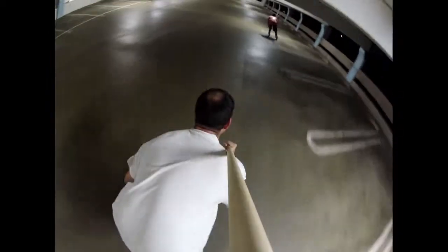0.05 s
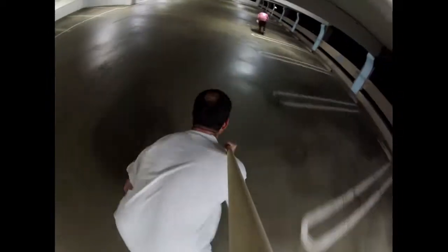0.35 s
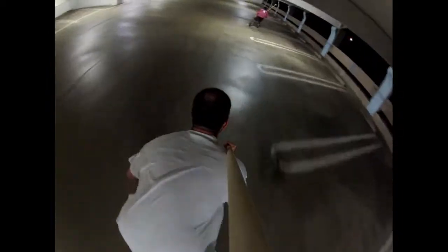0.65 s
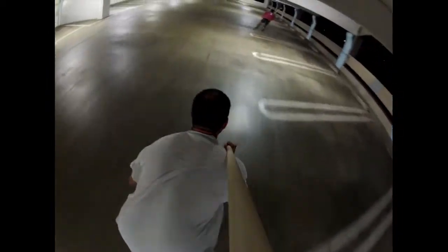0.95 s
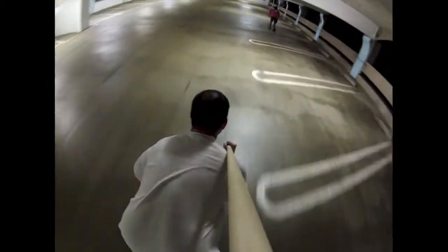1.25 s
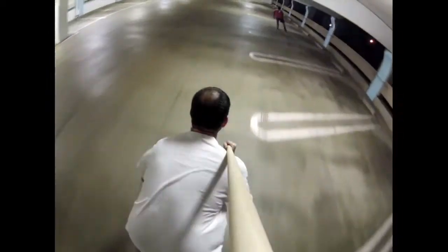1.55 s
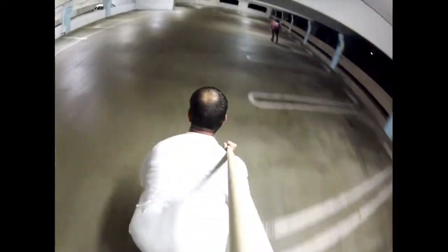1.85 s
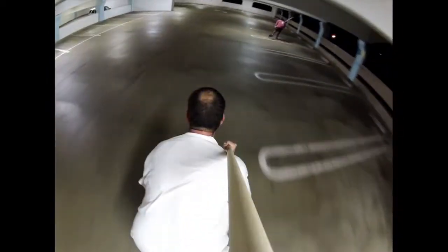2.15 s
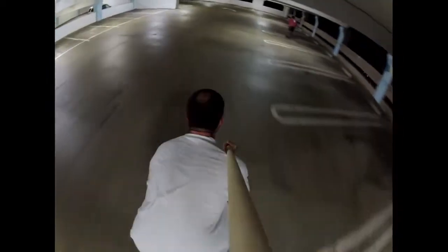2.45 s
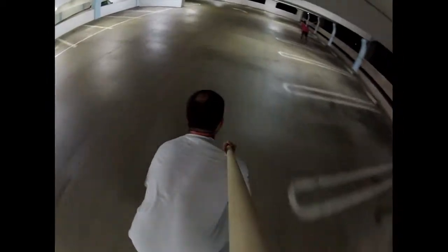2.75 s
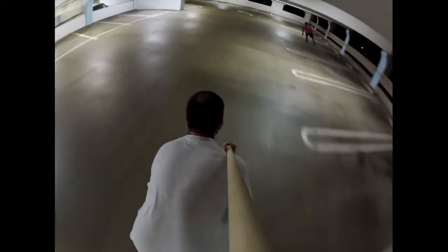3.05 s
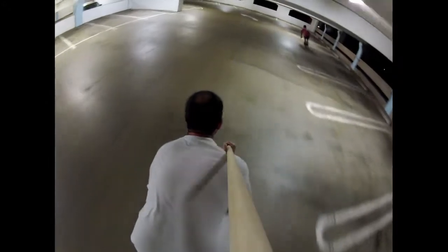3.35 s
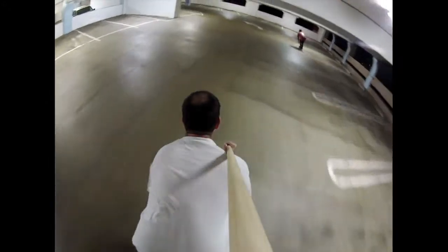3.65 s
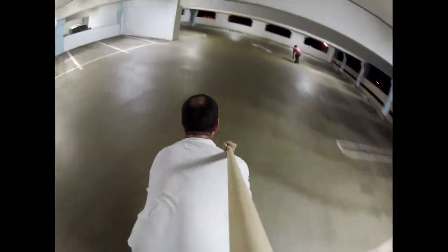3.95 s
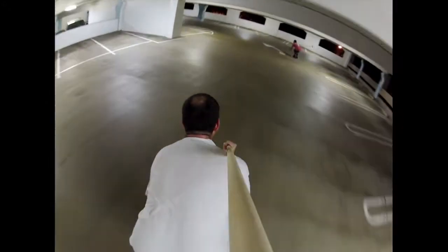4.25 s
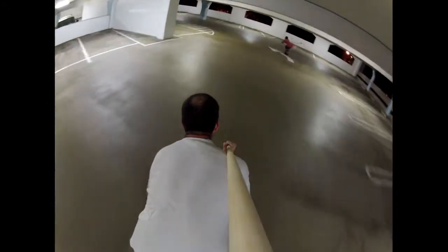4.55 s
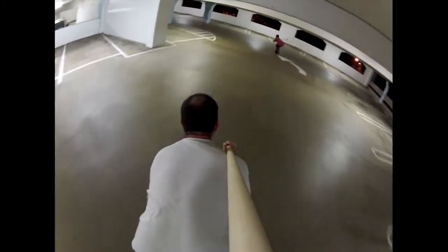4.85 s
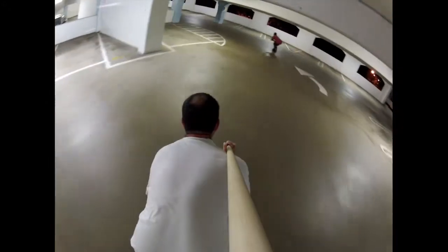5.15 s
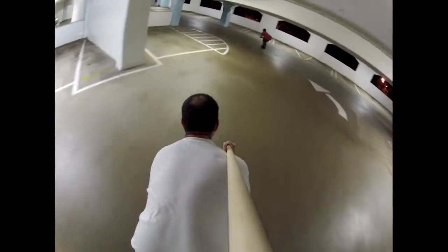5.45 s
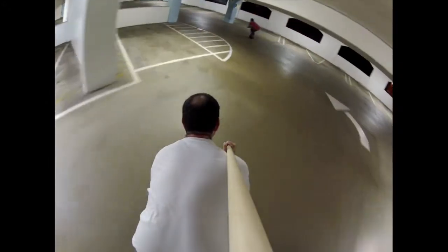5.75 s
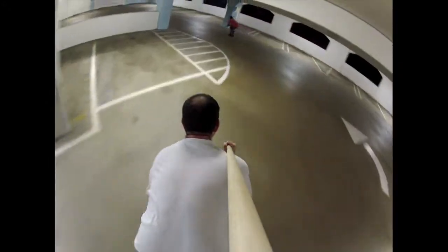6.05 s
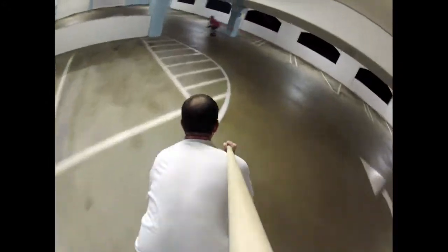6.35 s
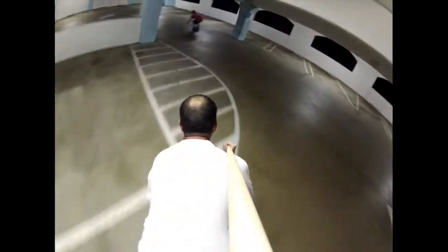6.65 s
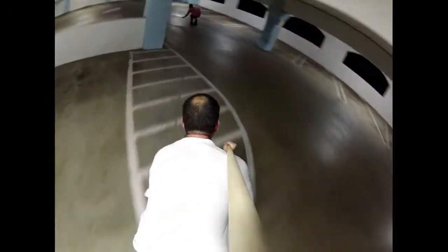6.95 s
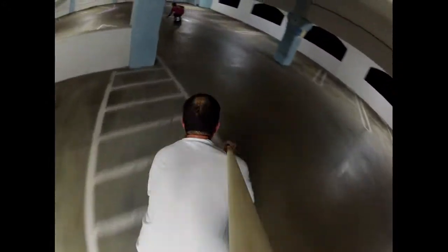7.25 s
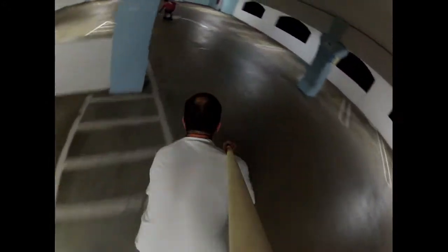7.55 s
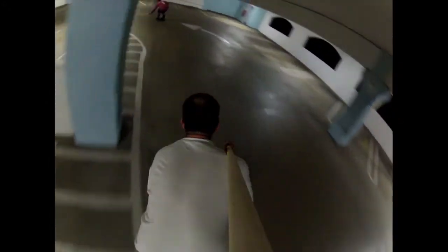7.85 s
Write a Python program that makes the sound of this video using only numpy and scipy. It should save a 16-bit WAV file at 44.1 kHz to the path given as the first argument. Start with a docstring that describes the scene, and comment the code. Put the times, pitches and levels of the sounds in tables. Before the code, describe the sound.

Inline skates coast fast over concrete in a parking garage, heard from close behind the skater. A deep, steady rumble with a faint gritty hiss runs for the whole eight seconds. It is loudest in the first second, then settles a little lower. The rolling swells into short, hollow booms right at the start and around 1, 2 and 3 seconds, more softly between 4 and 5 seconds, and again from about 6 to 7.5 seconds. At about 0.6 seconds a wheel skips in a quick, stuttering squeak. A much fainter chirp comes near 1.6 seconds, and a brief double squeak at about 4.2 seconds. These squeaks are quieter than the rumble and carry a slight echo from the bare concrete. Underneath, passing air buffets the microphone with a soft, low flutter, strongest a little after 1 second. The wheels are still rolling at the end.

```python
"""Parking garage, concrete ramp: inline skates coast down fast, heard from behind the skater.
The rough floor drums through wheels and boots, and the rumble swells into short hollow booms.
The wheels hiss and twice chatter with a stick-slip squeak. Air buffets the microphone.
A low-rate sample-and-hold adds a thin fizz on top."""
import sys
import numpy as np
from scipy import signal
from scipy.fft import rfft, irfft, next_fast_len
from scipy.io import wavfile
from scipy.ndimage import uniform_filter1d

SR = 44100
rng = np.random.default_rng(int(sys.argv[2]) if len(sys.argv) > 2 else 0)


def transcribe(signal):
    """Save signal, clipped to [-1, 1], as a 16-bit WAV file at the path in sys.argv[1]."""
    frames = np.atleast_2d(signal).T
    limited = np.clip(frames, -1, 1)
    pcm = np.round(limited * 32767).astype(np.int16)
    wavfile.write(sys.argv[1], SR, pcm)


N = 349272
TIME_S = np.arange(N) / SR


def rolling(rumble_db, roar_db, hiss_db):
    """Coarse bumps shake boots and floor, finer grain drums on the wheels, the finest hisses."""
    # boot and floor spectrum: (frequency [Hz], density [dB])
    rumble_spectrum = [(50, -27), (85, -10), (115, 1.5), (145, 0.5), (200, -1.5), (270, -6), (320, -13.5),
                       (420, -24.5), (700, -49)]
    # wheel spectrum: (frequency [Hz], density [dB])
    roar_spectrum = [(180, -19), (310, 1), (400, 1), (550, 0.5), (630, -2.5), (720, -10), (810, -11.5),
                     (920, -21), (1100, -25), (1600, -43.5)]
    # tread spectrum: (frequency [Hz], density [dB])
    hiss_spectrum = [(500, -4.5), (1000, -1.5), (1300, -3.5), (1650, 0), (2300, 0.5), (2750, -2),
                     (3100, -2), (3600, -8.5), (3900, -6), (4400, -10.5), (5000, -10.5), (5400, -17.5),
                     (5900, -21.5)]
    # bearing ring: (frequency [Hz], width [Hz], level re hiss [dB])
    bearing_mode = (3765, 49, -20.5)
    rumble = from_db(rumble_db) * coloured(grit(per_s=5000, spread_db=4), rumble_spectrum)
    roar = from_db(roar_db) * coloured(grit(per_s=4000, spread_db=1.5), roar_spectrum)
    wash = from_db(2.5) * rng.standard_normal(N)  # grain blurred by the walls
    tread = coloured(unit_rms(grit(per_s=5000, spread_db=2.5)) + wash, hiss_spectrum)
    hz, width_hz, bearing_db = bearing_mode
    bearing = from_db(bearing_db) * unit_rms(resonance(rng.standard_normal(N), hz, width_hz))
    patches_db = 0.4 * drift(rate_hz=2.3)  # rougher and smoother concrete
    return (rumble + roar + from_db(hiss_db) * (tread + bearing)) * from_db(patches_db)


def rolling_levels_db():
    """Rumble, roar and hiss follow the coasting; each swell lifts all three."""
    # coasting: (time [s], rumble [dB], hiss [dB])
    coast = [(0, -26, -51.5), (.5, -29, -51.5), (1.15, -30, -54.5), (1.47, -33.5, -56), (2.1, -32.5, -53),
             (2.6, -34.5, -54.5), (3.85, -34.5, -54.5), (4.6, -35, -55.5), (5.4, -34, -54.5),
             (6.15, -35.5, -55), (7.0, -34.5, -54), (7.92, -36, -53.5)]
    # rolling swells: (centre [s], length [s], roar rise [dB])
    swells = [(.1, 0.43, 3), (0.955, 0.43, 3.5), (1.922, 0.26, 5), (2.924, 0.32, 5.5), (4.08, 0.5, 3),
              (4.475, 0.21, 2.5), (6.59, 0.26, 4), (6.947, 0.34, 1.5), (7.463, 0.28, 2.5)]
    rumble_db, hiss_db = curves(coast)
    rise_db = sum(db * bell(TIME_S, centre_s, length_s, flatness=2.8)
                  for centre_s, length_s, db in swells)
    roar_db = hiss_db + 12 + 0.11 * (rumble_db - rumble_db.mean())
    return rumble_db + 0.66 * rise_db, roar_db + rise_db, hiss_db + 0.5 * rise_db


def grit(per_s, spread_db):
    """Tiny uneven impacts of the wheels on the concrete grain."""
    hits = rng.random(N) < per_s / SR
    return hits * rng.choice([-1, 1], N) * from_db(spread_db * rng.standard_normal(N))


def booms(waver_hz=2.64, flutter_db=2.06):
    """The rumble gathers on low notes that swell, waver and fade."""
    # hollow booms: (centre [s], length [s], pitch [Hz], level [dB])
    notes = [(.11, 0.23, 258.7, -24), (.13, 0.31, 311, -31.5), (.4, .38, 176.5, -26.5),
             (.98, .25, 229, -31.5), (1.0, .24, 296.3, -33.5), (1.04, .5, 173.6, -25.5),
             (1.82, .2, 290, -28.5), (1.98, .29, 216.5, -30.5), (2.92, 0.29, 208, -32.5),
             (2.94, .3, 173, -32), (4.17, 0.24, 138.8, -32), (4.211, .18, 90, -33), (4.55, .2, 136.8, -34),
             (5.07, .17, 99.4, -33.5), (5.95, .2, 198, -29), (6.55, 0.21, 145.3, -33), (6.6, .24, 197, -28),
             (7.05, .4, 202, -33.5), (7.4, .16, 94, -31.5)]
    detune_hz = waver_hz * drift(rate_hz=10)
    flutter = from_db(flutter_db * drift(rate_hz=9.1))
    out = np.zeros(N)
    for centre_s, length_s, hz, db in notes:
        near = abs(TIME_S - centre_s) < length_s
        cycles = np.cumsum(hz + detune_hz[near]) / SR + rng.random()
        out[near] += from_db(db) * bell(TIME_S[near], centre_s, length_s) * np.sin(2 * np.pi * cycles)
    return out * flutter


def chatter(slips_per_s=480, jitter=0.55, spread_db=1.6):
    """A skipping wheel sticks and slips in quick uneven steps; each rings the frame."""
    # wheel skips: (centre [s], length [s], level [dB])
    skips = [(0.633, 0.017, -44.5), (0.65, 0.017, -46.5), (0.67, 0.019, -42), (0.688, 0.018, -48),
             (0.705, 0.015, -44), (1.646, 0.03, -51), (4.172, 0.019, -44), (4.193, 0.022, -45)]
    # wheel frame modes: (frequency [Hz], width [Hz], gain [dB])
    modes = [(840, 110, 1.5), (1680, 200, 1), (1930, 180, 1.5), (2680, 240, -17), (3750, 250, -14),
             (4870, 250, -18)]
    slip_count = np.cumsum(slips_per_s * np.exp(jitter * drift(rate_hz=120))) / SR
    slips = np.diff(np.floor(slip_count), prepend=0) * from_db(spread_db * rng.standard_normal(N))
    ring = sum((-1) ** k * from_db(db) * resonance(slips, hz, width_hz)
               for k, (hz, width_hz, db) in enumerate(modes))
    ring /= np.sqrt(uniform_filter1d(ring ** 2, size=SR // 100) + 1e-12)  # friction caps the swing
    force = sum(from_db(db) * bell(TIME_S, centre_s, length_s) for centre_s, length_s, db in skips)
    return force * ring


def wind(gust_db=0.7):
    """Passing air buffets the microphone in small random gusts."""
    # wind, dropping as the skater slows: (time [s], level [dB])
    airflow = [(0, -39), (1.2, -33.5), (1.85, -41), (2.5, -37.5), (4.4, -40.5), (5.8, -41.5), (7.05, -38.5),
               (7.92, -43.5)]
    # buffeting spectrum: (frequency [Hz], density [dB])
    spectrum = [(12, -17), (25, -8.5), (38, -3), (52, -1.5), (75, 0.5), (100, -6.5), (200, -25), (500, -56)]
    level_db, = curves(airflow)
    gain = from_db(level_db + gust_db * drift(rate_hz=2.5))
    return gain * coloured(rng.standard_normal(N), spectrum)


def garage(x, wet_db=-20, t60_s=0.78, predelay_s=0.012):
    """Bare concrete returns a dense tail."""
    t = TIME_S[:2 * SR]
    tail = rng.standard_normal(len(t)) * from_db(-60 * t / t60_s) * (t > predelay_s)
    wet = signal.fftconvolve(x, tail / np.linalg.norm(tail))[:N]
    return (x + from_db(wet_db) * wet) / np.sqrt(1 + from_db(wet_db) ** 2)


def from_db(db):
    """Decibels to gain."""
    return 10 ** (np.asarray(db) / 20)


def unit_rms(x):
    """Scale to rms 1."""
    return x / np.sqrt(np.mean(x ** 2) + 1e-20)


def curves(rows):
    """Interpolate (time [s], values...) rows at every sample."""
    times_s, *columns = np.transpose(rows)
    return [np.interp(TIME_S, times_s, column) for column in columns]


def coloured(x, spectrum):
    """Apply a spectrum, falling 12 dB per octave past its ends; rms 1."""
    hz, db = np.transpose(spectrum)
    size = next_fast_len(N + SR // 2)
    bins_hz = np.maximum(np.fft.rfftfreq(size, 1 / SR), 1)
    skirts = np.minimum(1, np.minimum(bins_hz / hz[0], hz[-1] / bins_hz)) ** 2
    gain = from_db(np.interp(np.log(bins_hz), np.log(hz), db))
    return unit_rms(irfft(rfft(x, size) * skirts * gain, size)[:N])


def drift(rate_hz):
    """Smooth random curve, rms 1."""
    hop, settle = 40, 2000
    r = np.exp(-2 * np.pi * rate_hz * hop / SR)
    noise = rng.standard_normal(N // hop + settle + 2)
    slow = signal.lfilter([1], [1, -2 * r, r * r], noise)[settle:]
    return np.interp(np.arange(N) / hop, np.arange(len(slow)), unit_rms(slow))


def resonance(x, hz, width_hz):
    """Two-pole band-pass, peak gain 1."""
    r = np.exp(-np.pi * width_hz / SR)
    b = np.array([1, 0, -1]) * (1 - r * r) / 2
    a = [1, -2 * r * np.cos(2 * np.pi * hz / SR), r * r]
    return signal.lfilter(b, a, x + 1e-18)


def bell(t, centre_s, length_s, flatness=2):
    """Envelope of height 1; flatness above 2 steepens the sides and widens the top."""
    return np.exp(-np.minimum(abs(2 * (t - centre_s) / length_s) ** flatness, 20))


def scene():
    """Rolling, booms, reverberant chatter and wind; mono."""
    wheels = rolling(*rolling_levels_db())
    return (wheels + booms() + garage(chatter()) + wind())[None]


def record(dry):
    """Sample-and-hold mirrors the sound faintly into the treble; a low-pass cuts the top."""
    hold_hz, cutoff_hz = 12000, 14250
    slow = signal.resample_poly(dry, hold_hz, SR, axis=1, window=("kaiser", 3))
    steps = np.repeat(slow, 4, axis=1)
    held = signal.resample_poly(steps, SR, 4 * hold_hz, axis=1)[:, :N]
    lowpass = signal.firwin(601, cutoff_hz, window="blackman", fs=SR)
    return signal.fftconvolve(held, lowpass[None], mode="same", axes=1)


dry = scene()
out = record(dry)
transcribe(out)
```